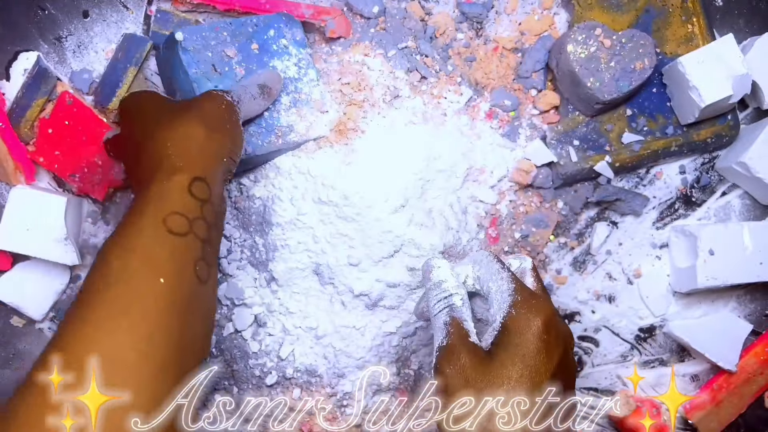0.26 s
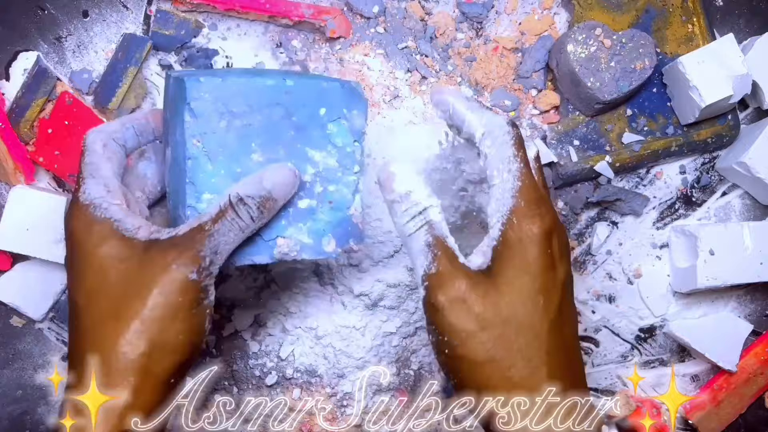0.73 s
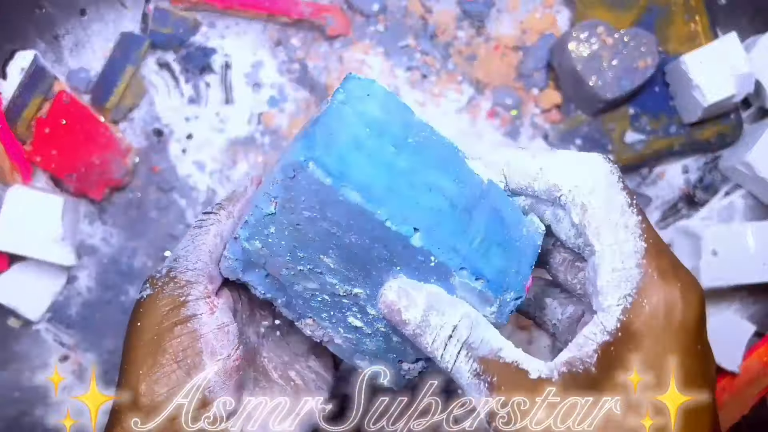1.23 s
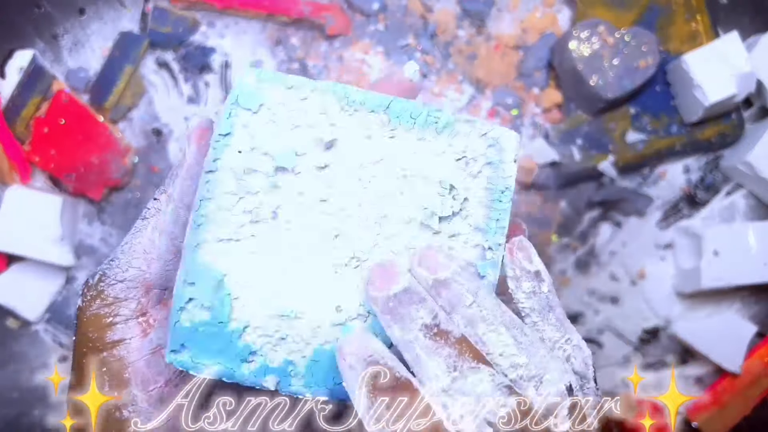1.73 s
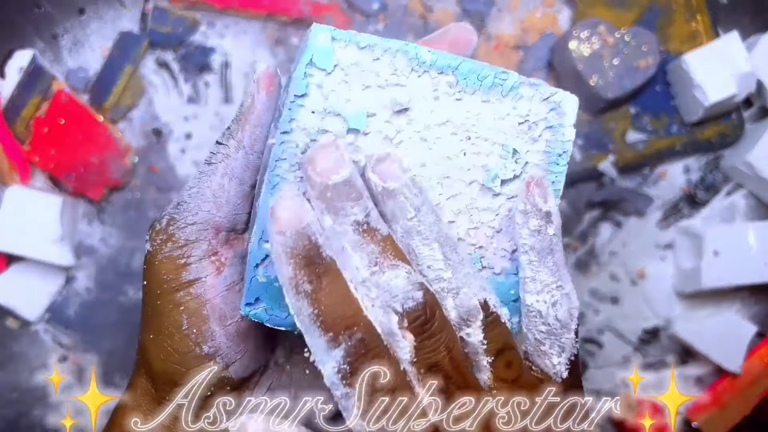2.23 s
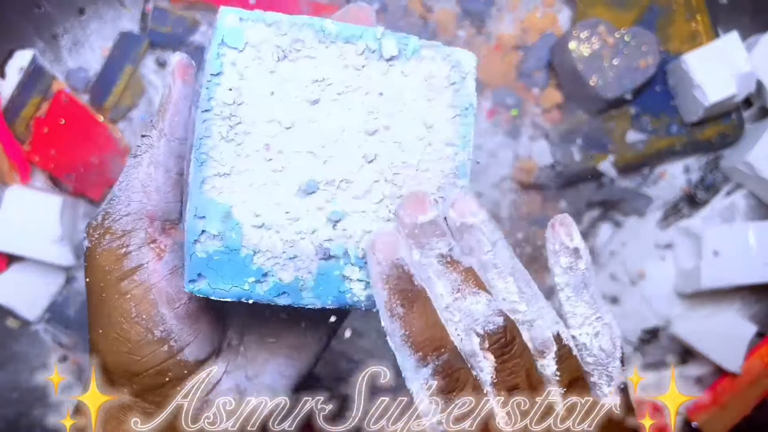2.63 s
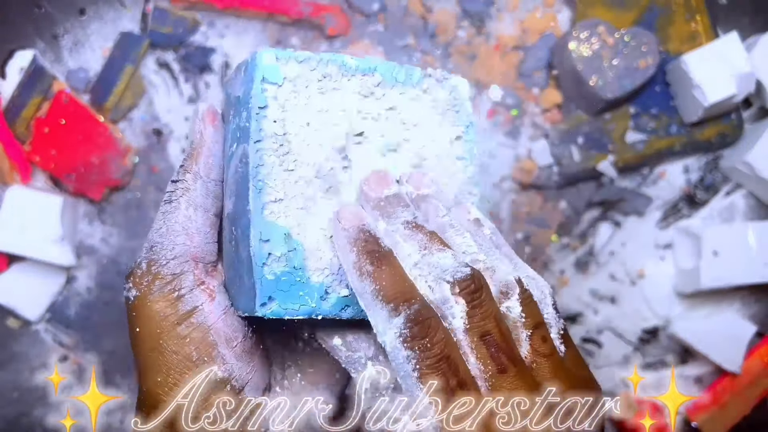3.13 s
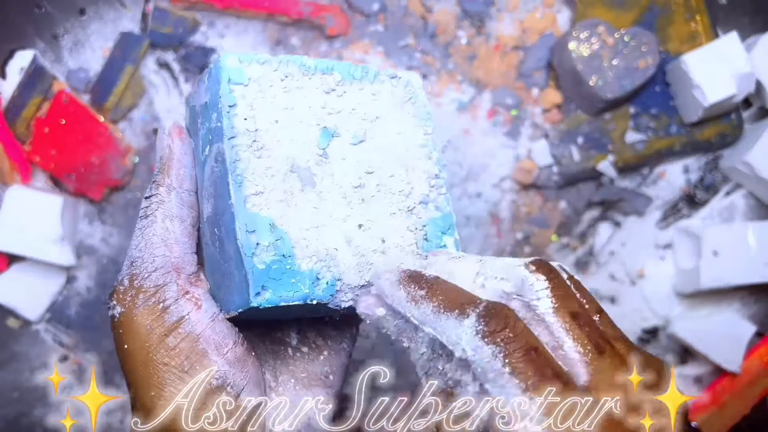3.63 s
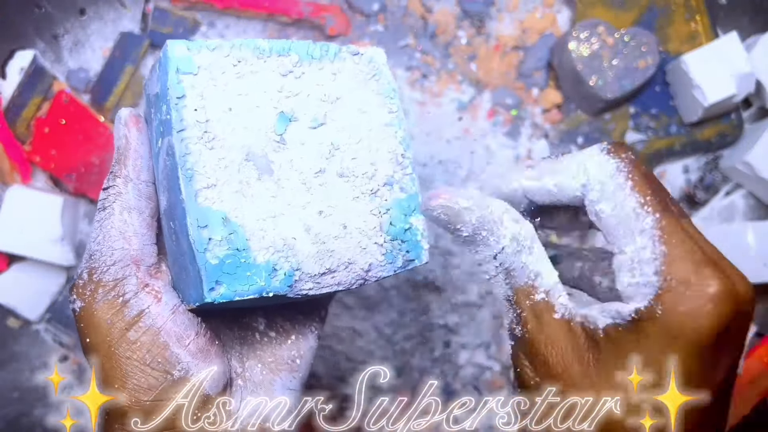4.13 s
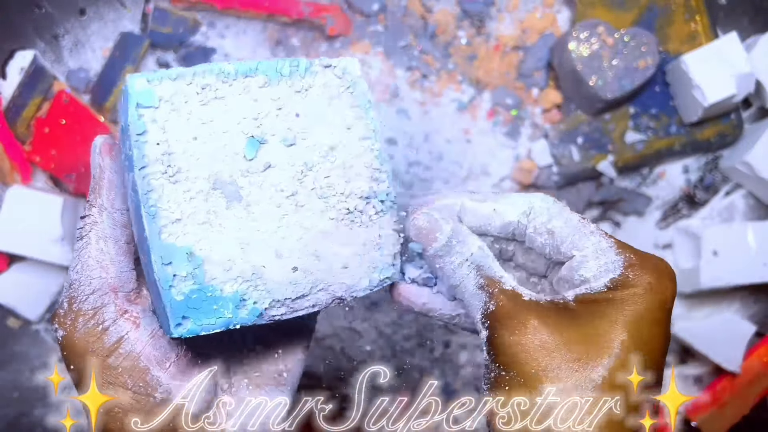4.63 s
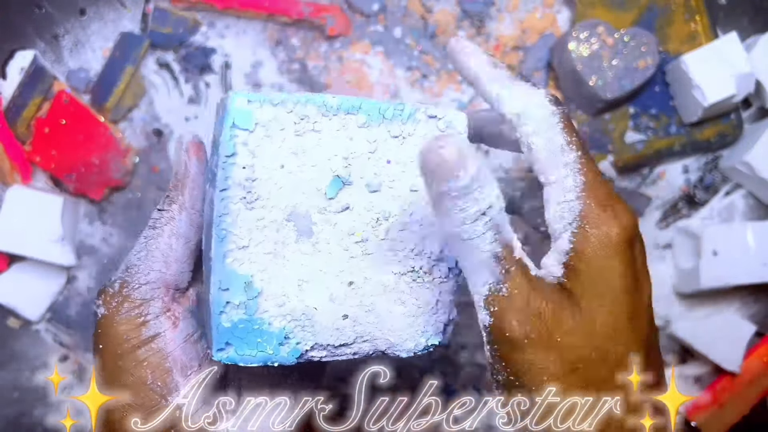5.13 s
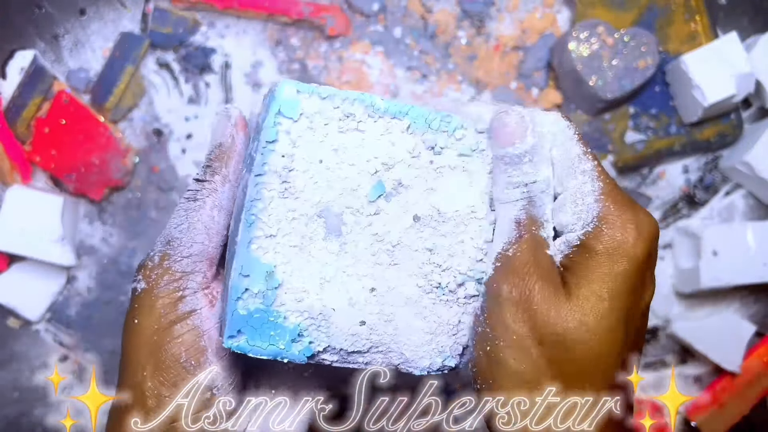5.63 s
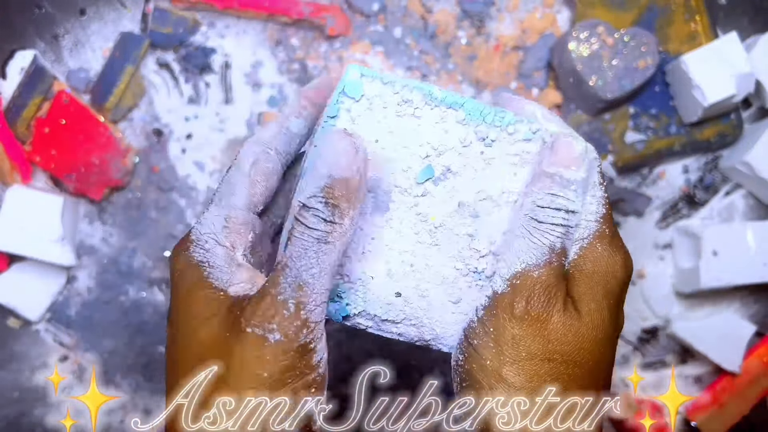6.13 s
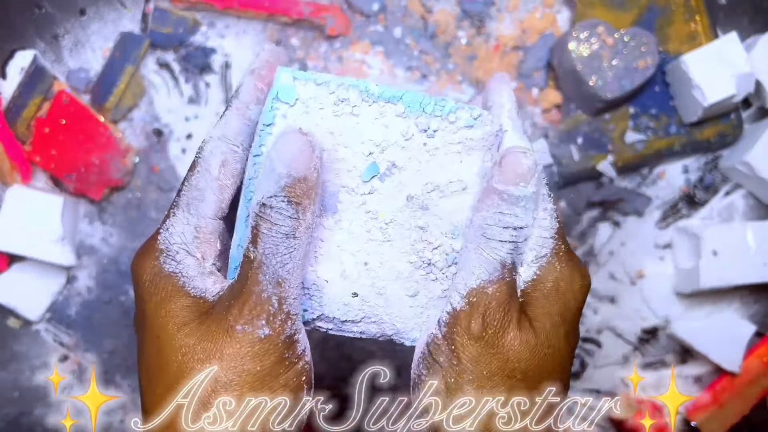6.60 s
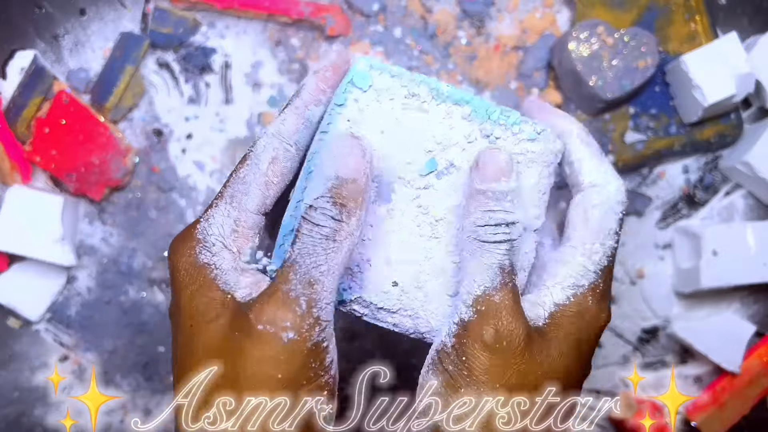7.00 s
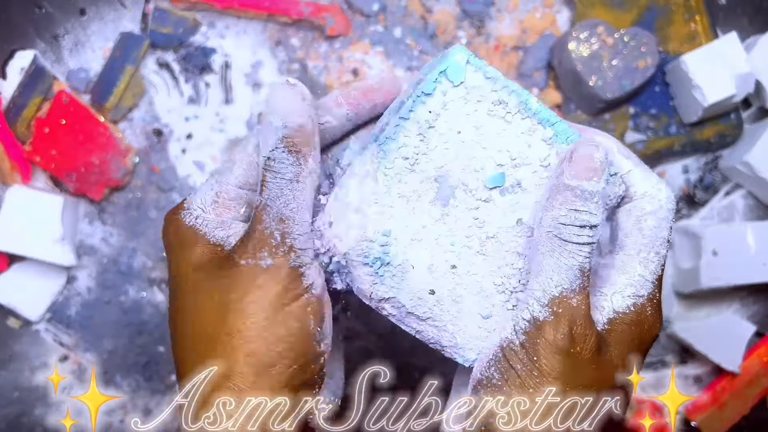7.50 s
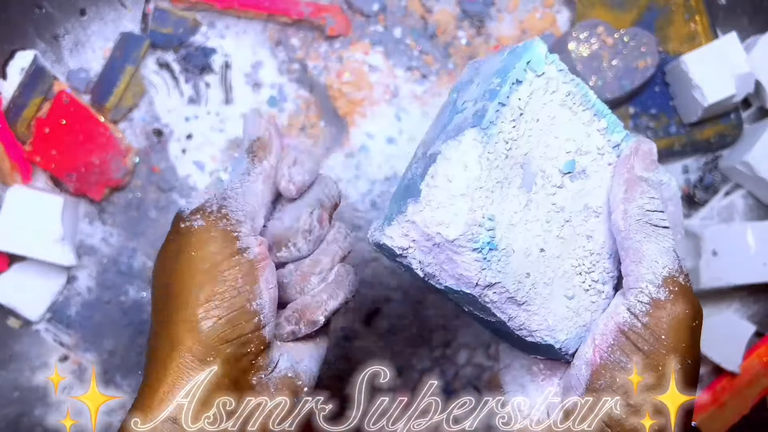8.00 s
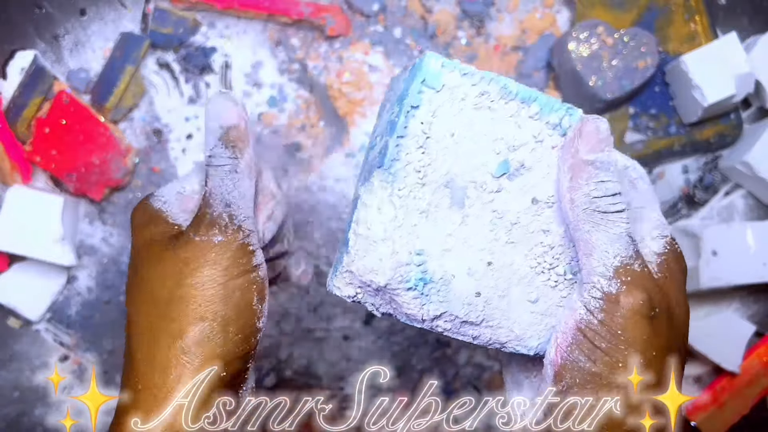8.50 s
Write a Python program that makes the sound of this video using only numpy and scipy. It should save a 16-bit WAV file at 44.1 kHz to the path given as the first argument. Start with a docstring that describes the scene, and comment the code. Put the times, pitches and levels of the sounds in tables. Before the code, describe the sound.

Hands rub and crumble a dry chalk block up close, gritty hisses and flake snaps, with lumps clattering onto a table over fan noise.

```python
"""In a small room, close to a stereo microphone, two hands rub and crumble a block of gym chalk over a table.
Each rubbing stroke is shaped noise: powder hisses, grit crunches and crumbs tick. Flakes snap in short noise bursts.
A few lumps drop and shatter; their blows set the table top ringing, and it booms softly.
A fan, made of filtered noise, blows on the right over rumble and a wavering hum.
Early on the whole sound fades almost to silence and returns."""
import sys
import numpy as np
from scipy import signal
from scipy.fft import rfft, irfft
from scipy.io import wavfile

SR = 44100
rng = np.random.default_rng(int(sys.argv[2]) if len(sys.argv) > 2 else 0)


def put_to_file(sound):
    """Save the sound as 16-bit audio at rate SR, in the file named by the first command-line argument."""
    columns = np.atleast_2d(sound).T  # one column per channel
    safe = np.clip(columns, -1, 1)
    whole_steps = np.round(safe * 32767)
    wavfile.write(sys.argv[1], SR, whole_steps.astype(np.int16))


N = 385875  # length in samples

# All table levels are relative; the functions add their own gains.
# wavering hum tones of the motor: (f/Hz, level/dB)
HUM_TONES = [(59.3, -38), (328, -50.5)]
# noise spectra of the rumble, the air and the fan: (f/Hz, level/dB)
RUMBLE_SPECTRUM = [(20, -27), (40, -4), (58, 1.5), (80, 6), (97, -7.5), (125, 1.5), (165, -9), (250, -12.5),
                   (330, -12), (470, -24.5), (900, -43), (2500, -57)]
AIR_SPECTRUM = [(100, -1.5), (330, -2), (480, -3.5), (800, -7), (2000, -21), (3500, -27.5), (6500, -29),
                (9000, -32), (16000, -50)]
FAN_SPECTRUM = [(500, -29), (780, -14), (980, 0), (1300, -3), (1650, -3.5), (2000, -11.5), (2500, -21),
                (2900, -18), (3700, -25.5), (4700, -25), (6000, -18), (7500, -40)]

# finger strokes over the block: (start t/s, length t/s, fine powder level/dB, coarse grit level/dB)
FINGER_STROKES = [(0, 0.1, -39, -29), (0.197, 0.085, -56, -28), (0.342, 0.091, -65, -32),
                  (0.45, 0.085, -48, -36), (0.946, 0.019, -27, -25), (1.009, 0.27, -31.5, -33.5),
                  (1.437, 0.1, -44, -38), (1.587, 0.12, -34, -34.5), (1.73, 0.06, -35, -40),
                  (1.89, 0.018, -38, -32), (1.995, 0.39, -35.5, -39), (2.224, 0.37, -26, -35),
                  (2.375, 0.079, -23, -32), (2.52, 0.29, -24, -30.5), (2.858, 0.15, -25.5, -31),
                  (2.993, 0.099, -36, -39), (3.078, 0.089, -22.5, -31), (3.163, 0.21, -28.5, -35.5),
                  (3.323, 0.04, -17.5, -22.5), (3.41, 0.038, -14, -21), (3.476, 0.42, -42, -38),
                  (3.838, 0.19, -34, -38), (4.185, 0.04, -35.5, -47), (4.319, 0.08, -28.5, -31.5),
                  (4.454, 0.041, -16, -21.5), (4.548, 0.09, -30.5, -30), (4.693, 0.023, -19.5, -24.5),
                  (4.809, 0.052, -22, -30), (4.894, 0.12, -31, -42), (5.206, 0.1, -30.5, -37.5),
                  (5.318, 0.17, -23.5, -33), (5.546, 0.098, -25.5, -27.5), (5.69, 0.15, -31, -34.5),
                  (5.905, 0.2, -32.5, -32), (6.176, 0.052, -25.5, -31), (6.267, 0.24, -39, -45),
                  (6.49, 0.1, -27, -31), (6.664, 0.07, -30, -34), (6.894, 0.17, -34.5, -35),
                  (7.048, 0.1, -32, -31), (7.193, 0.075, -30, -31.5), (7.268, 0.061, -21.5, -19.5),
                  (7.46, 0.052, -31, -31), (7.772, 0.092, -35, -32.5), (7.885, 0.17, -31, -32),
                  (8.14, 0.029, -36, -46), (8.273, 0.17, -30, -29.5), (8.406, 0.14, -36, -38),
                  (8.688, 0.24, -32, -28.5)]
# flat fingers sweeping the block's face: (start t/s, length t/s, level/dB)
FLAT_SWEEPS = [(1.02, 0.25, -38.5), (1.99, 0.51, -37.5), (2.58, 0.74, -35.5)]
# narrow resonances of the rasp: (f/Hz, width f/Hz, level/dB)
RASP_RESONANCES = [(4500, 280, 1.5), (4950, 410, 0), (5240, 390, -4)]
# noise spectra of powder and grit: (f/Hz, level/dB)
POWDER_SPECTRUM = [(300, -15.5), (1000, 0.5), (2000, -10.5), (3200, -8.5), (5500, 4), (7200, -0.5),
                   (9000, -0.5), (11000, 1), (16000, 0)]
GRIT_SPECTRUM = [(150, 3), (600, 2), (1500, 6), (2300, 5), (3600, 2.5), (5500, -8), (8000, -13.5),
                 (16000, -39)]
# ringing modes of the chalk block in the hand: (f/Hz, level/dB, time to fall 60 dB t/s)
BLOCK_MODES = [(662, -15, 0.044), (1920, 2, 0.047), (2210, -3, .04), (2650, -1.5, 0.027),
               (2960, -6.5, 0.04), (4000, -3, 0.073), (4160, -7, 0.031), (4950, -5.5, 0.045),
               (5980, -15, .045)]
# soft hollow crunches: fingers pressing or shifting the block, a fallen lump packing into powder:
# (centre t/s, level/dB, half-length t/s, hollow pitch f/Hz)
SOFT_CRUNCHES = [(0.04, -24, 0.027, 704), (0.208, -27, 0.016, 754), (0.41, -28, 0.011, 650),
                 (2.072, -33.5, 0.15, 1670), (2.28, -36, 0.17, 282), (2.4, -33.5, 0.045, 655),
                 (2.91, -31.5, 0.018, 680), (3.10, -35, 0.028, 650), (3.444, -33, 0.023, 654),
                 (3.677, -12.5, 0.011, 620), (3.859, -13.5, 0.0039, 654), (7.922, -36.5, 0.25, 348)]

# flakes snapping off: (t/s, level/dB, treble relative to the middle level/dB, clink of the block level/dB)
FLAKE_SNAPS = [(0.036, -13, -5.5, -27), (0.177, -17.5, 1, -30), (0.193, -21, -2, -40),
               (0.357, -30, -6, -36), (0.404, -22, -12.5, -32), (1.72, -16, -1, -29.5),
               (2.013, -26, 5, -42), (2.067, -33, -1, -35), (2.3555, -29, 7, -40), (2.375, -23, 6, -38),
               (2.58, -19, 3, -36), (2.61, -24, 7, -40), (2.645, -10.5, -1, -30), (2.65, -12.5, -6, -30),
               (2.719, -17, 5, -36), (2.766, -19.5, 12, -36), (2.7865, -10.5, 8, -32),
               (2.854, -15, -10, -34), (2.879, -25, 5, -34), (2.91, -22, 3, -34), (2.952, -24, 3, -38),
               (2.985, -22, 0, -38), (3.093, -17, -4, -32), (3.281, -31, 11, -44), (3.503, -23, -1, -38),
               (4.511, -11.5, -15, -33), (4.569, -22, -3, -40), (4.593, -25, 4, -42),
               (4.619, -21, -10, -34), (4.887, -25, -4, -40), (4.922, -26.5, 9, -42), (4.957, -33, 13, -46),
               (5.2, -29, 8, -46), (5.2488, -23.5, 13, -36), (5.336, -25, 3, -38), (5.44, -25, 12, -40),
               (5.596, -16.5, 2, -40), (5.965, -23, 13.5, -42), (6.207, -29, 9, -42), (6.518, -23, 9, -42),
               (6.712, -26.5, 6, -42), (7.316, -22, 9, -32), (7.473, -28, 9, -46), (7.818, -20, 3.5, -40),
               (8.234, -31, 8, -46), (8.377, -21.5, 7, -40), (8.398, -15, -2, -11.5),
               (8.407, -22, -10, -21), (8.452, -22, -5, -23), (8.547, -21.5, -7, -32)]
# noise spectrum of a snap: (f/Hz, level/dB)
SNAP_SPECTRUM = [(200, -19), (700, 7.5), (1500, 0), (2600, 4.5), (4500, 5.5), (6500, -0.5), (10000, -7.5),
                 (16000, -13.5)]

# lumps landing and the block being bumped: (t/s, shatter level/dB, knock level/dB, thud level/dB,
# crumbling time to fall 60 dB t/s, treble relative to the middle level/dB, lump pitch f/Hz)
LUMP_FALLS = [(0.0365, -35, -14, -16, 0.04, 0, 2000), (0.067, -44, -33, -18, .1, 0, 2500),
              (0.178, -32, -16, -30, .03, 2, 2000), (0.207, -33, -20, -22.5, 0.049, -3, 2500),
              (3.625, -10, -18, -40, 0.05, 4, 3000), (3.638, -7, -26, -17, 0.16, 1, 3350),
              (3.65, -5, -19, -23, 0.15, 1, 2900), (3.659, -4.5, -22, -23, 0.088, -1, 3800),
              (3.668, -24, -0.5, 5.5, 0.05, 0, 2500), (3.686, -15, -23, -21, 0.067, 10, 4300),
              (3.706, -8, -27, -32, 0.059, 5, 5400), (3.715, -6, -26, -35, 0.06, -4, 5370),
              (3.738, -17.5, -28, -16.5, 0.45, -1, 3400), (3.754, -25, -19, -27, 0.033, -7, 5200),
              (3.766, -18, -24, -29, 0.073, -7, 2700), (3.795, -9, -35, -19.5, 0.099, -22, 3100),
              (3.852, -3.5, -27, -8.5, 0.018, -9, 2850), (3.861, -21, -28, -28, .06, -2, 3400),
              (3.902, -26.5, -39, -23, 0.11, 7.5, 4500), (3.928, -19.5, -20, -41, 0.028, -9, 3070),
              (4.7094, -1, 4, -22, 0.043, 0.5, 2100), (4.715, -8.5, -8.5, -12, 0.1, -6, 2850),
              (4.8222, -10, -15, -37, 0.033, -4, 3050), (4.826, -23, -15, -23, 0.058, 1, 2450),
              (8.2612, -40, -19, -46, 0.02, -2, 2500)]
# ringing modes of the table top: (f/Hz, level/dB, time to fall 60 dB t/s)
TABLE_MODES = [(140.5, 0, 0.12), (196.6, -13, 0.26), (327, -4.5, 0.11), (411.5, 1.5, 0.21),
               (560, -3, 0.056), (754, -10, 0.12), (860, -2.5, 0.083), (966, -0.5, 0.12), (1507, -12, .2),
               (1820, -12, 0.16), (2090, -3.5, 0.098), (2400, -2, 0.098), (2500, -20, 0.15),
               (2930, -9, .18), (3483, -11.5, .14)]
# noise spectra of shattering, knocking and thudding: (f/Hz, level/dB)
SHATTER_SPECTRUM = [(300, -18), (1800, -14), (2800, 2.5), (4000, 0), (6000, -0.5), (8000, -10),
                    (11000, -8.5), (16000, -36)]
KNOCK_SPECTRUM = [(80, -10), (290, -26), (410, 1.5), (620, -8.5), (920, 12), (1300, -2), (1800, 3.5),
                  (2400, 5), (5000, -24), (12000, -33)]
THUD_SPECTRUM = [(40, -28.5), (90, 7.5), (135, 6), (190, 1.5), (320, 5.5), (430, 0), (640, -2.5),
                 (1200, -10.5), (4000, -39)]

# resonances of the right microphone port: (f/Hz, width f/Hz, boost level/dB)
PORT_RESONANCES = [(1110, 1100, -2.5), (4676, 380, 7.5), (5460, 880, 6)]

# time scales of a stroke's smooth start and end
STROKE_ATTACK_S, STROKE_RELEASE_S = 0.0097, 0.016
STROKE_EASE = 0.055  # share of the stroke's length added to both
# faint rustle of the holding hand, under the strokes
HOLD_POWDER_DB, HOLD_GRIT_DB = -50, -48
# bright flakes die away sooner: the t60 halves for this much more treble
SNAP_T60_S, SNAP_HALVING_DB = 0.048, 40
# range of crumb pitches; each tick falls 60 dB in this many cycles
CRUMB_LOW_HZ, CRUMB_HIGH_HZ, CRUMB_CYCLES = 4300, 14500, 28
# the thud comes just after the contact and leaves a low boom
THUD_LAG_S, BOOM_T60_S = 0.00296, 0.3
FADE_OUT_START_S, FADE_OUT_END_S, FADE_IN_START_S, FADE_IN_END_S = 0.64, 0.785, 0.87, 1.054
FADE_CURVE, FADE_FLOOR_DB = 1.3, -64
CUTOFF_HZ = 15880


def from_db(db):
    """Turn decibels into a gain."""
    return 10 ** (np.asarray(db) / 20)


def rms_one(x):
    """Scale to unit power."""
    return x / np.sqrt(np.mean(x ** 2) + 1e-20)


def drift(rate_hz):
    """Slow random wandering around zero with unit power, made by smoothing noise."""
    r = np.exp(-80 * np.pi * rate_hz / SR)
    noise = rng.standard_normal(N // 40 + 2002)  # one value per 40 samples
    slow = signal.lfilter([1], [1, -2 * r, r * r], noise)[2000:]
    return np.interp(np.arange(N) / 40, np.arange(len(slow)), rms_one(slow))


def colour(x, spectrum, size=8192):
    """Filter to the given spectrum with no sound ahead of the input; white noise keeps its power."""
    table_hz, table_db = np.transpose(spectrum)
    hz = np.arange(size // 2 + 1) * SR / size
    gain = rms_one(from_db(np.interp(np.log(hz + 1), np.log(table_hz), table_db)))
    # folding the cepstrum makes the filter minimum-phase
    cepstrum = irfft(np.log(gain))[:size // 2]
    cepstrum[1:] *= 2
    response = irfft(np.exp(rfft(cepstrum, size)))
    return signal.oaconvolve(np.atleast_2d(x), response[None], axes=1)[:, :N]


def two_bands(low, high, split_hz):
    """Join the bass and middle of one sound to the treble of another."""
    lowpass = signal.butter(2, split_hz, "low", fs=SR, output="sos")
    highpass = signal.butter(2, split_hz, "high", fs=SR, output="sos")
    return signal.sosfilt(lowpass, low) + signal.sosfilt(highpass, high)


def ring(force, hz, t60):
    """One ringing mode: a unit click starts a dying sine of height about 1."""
    r, w = from_db(-60 / (t60 * SR)), 2 * np.pi * hz / SR
    return signal.lfilter([0, np.sin(w)], [1, -2 * r * np.cos(w), r * r], force + 1e-18)


def body(force, modes):
    """Let one force ring all modes of an object, with alternating signs."""
    out = 0
    for k, (hz, db, t60) in enumerate(modes):
        out = out + (-1) ** k * from_db(db) * ring(force, hz, t60)
    return out


def grains(per_s, spread_db):
    """Tiny fractures at random moments and of random size, radiating unevenly to the two sides."""
    sizes = from_db(spread_db * np.minimum(rng.exponential(1, N), 5))
    happens = rng.random(N) < per_s / SR
    return rms_one(sizes * happens * rng.standard_normal((2, N)))


def bursts(times, levels_db, t60s, crack_db=4, crack_t60=0.017, rise_s=0.00018, per_s=30000):
    """Each break opens with a hard crack, then an avalanche of fractures dies away."""
    envelope, t = np.zeros(N), np.arange(SR // 2) / SR
    for s, db, t60 in zip(times, levels_db, t60s):
        at = round(s * SR)
        shape_db = np.maximum(-60 * t / t60, crack_db - 60 * t / crack_t60)
        burst = from_db(db + shape_db) * (1 - np.exp(-t / rise_s))
        envelope[at:at + len(t)] += burst[:N - at]
    return envelope * grains(per_s=per_s, spread_db=2.0)


def taps(times, levels_db, lag_s=0.0003):
    """Single hard contacts as clicks, reaching the left microphone a little after the right."""
    out = np.zeros((2, N))
    for s, db in zip(times, levels_db):
        out[0, round((s + lag_s) * SR)] += from_db(db)
        out[1, round(s * SR)] += from_db(db)
    return out


def strokes(starts, lengths, levels_db, rest_db=-90):
    """Loudness of overlapping strokes: each swells, holds while the finger slides and dies away."""
    t, power = np.arange(0, N, 40) / SR, from_db(rest_db) ** 2
    for s, length, db in zip(starts, lengths, levels_db):
        attack = STROKE_ATTACK_S + STROKE_EASE * length
        release = STROKE_RELEASE_S + STROKE_EASE * length
        grip = .5 + .5 * np.tanh(.5 * (t - s) / attack)
        let_go = .5 + .5 * np.tanh(.5 * (s + length - t) / release)
        power = power + (from_db(db) * grip * let_go) ** 2
    return np.interp(np.arange(N) / SR, t, np.sqrt(power))


def slips(per_s, t60, depth):
    """The finger catches and slips at uneven moments; each slip sheds a quickly dying puff."""
    jerks = (rng.random(N) < per_s / SR) * rng.uniform(.3, 1, N)
    puffs = signal.lfilter([1], [1, -from_db(-60 / (t60 * SR))], jerks + 1e-18)
    return rms_one(1 - depth + depth * rms_one(puffs))


def crumbs(per_s, spread_db, count=18):
    """Crumbs crack at random moments, each ticking at one of a set of pitches; unit power."""
    ticks, dealt = grains(per_s, spread_db), rng.integers(0, count, N)
    out = 0
    for k, hz in enumerate(np.geomspace(CRUMB_LOW_HZ, CRUMB_HIGH_HZ, count)):
        out = out + ring(ticks * (dealt == k), hz, CRUMB_CYCLES / hz)
    return rms_one(out)


def background(rumble_db=-31.0, air_db=-36, fan_db=-25.5, fan_left_db=-15, waver_db=11.0, wander=0.93):
    """Rumble and a wavering hum reach both sides alike; the fan's hollow rush comes from the right."""
    rumble = from_db(rumble_db) * colour(rng.standard_normal(N), RUMBLE_SPECTRUM)
    air = from_db(air_db) * colour(rng.standard_normal((2, N)), AIR_SPECTRUM)
    fan = from_db(fan_db) * colour(rng.standard_normal((2, N)), FAN_SPECTRUM)
    fan = fan * from_db([[fan_left_db], [0]])
    t, hum = np.arange(N) / SR, 0
    for hz, db in HUM_TONES:
        swell, phase_drift = np.tanh(drift(3)), drift(3)
        tone = np.sin(2 * np.pi * hz * t + wander * phase_drift)
        hum = hum + np.sqrt(2) * from_db(db + waver_db * swell) * tone
    return rumble + air + fan + hum


def rubbing(powder_gain_db=0.67, grit_gain_db=0, crumb_gain_db=-6, block_db=-41, judder_db=1.5, clump_db=1.3):
    """Skin shears off hissing powder, grit rolls in clumps and single crumbs crackle under the fingers."""
    s, length, powder_db, grit_db = np.transpose(FINGER_STROKES)
    shearing = strokes(s, length, powder_db, HOLD_POWDER_DB)
    rolling = strokes(s, length, grit_db, HOLD_GRIT_DB)
    catching = slips(per_s=70, t60=0.076, depth=0.62)
    powder = grains(per_s=20000, spread_db=0.0) * shearing * slips(per_s=120, t60=0.073, depth=0.19)
    powder = powder * from_db(powder_gain_db + judder_db * drift(19))
    rasp = rasping() * strokes(*np.transpose(FLAT_SWEEPS)) * catching
    grit = grains(per_s=12000, spread_db=0.5) * rolling * catching
    grit = grit * from_db(grit_gain_db + clump_db * drift(32))
    crackle = crumbs(per_s=300, spread_db=1.3) * np.sqrt(rolling * shearing) * from_db(crumb_gain_db)
    block = from_db(block_db) * body(grit, BLOCK_MODES)
    return colour(powder, POWDER_SPECTRUM) + rasp + colour(grit, GRIT_SPECTRUM) + crackle + block


def soft_crunching(width=1.173):
    """Packing powder gives soft crunches: grains in a narrow hollow band swell and die away."""
    t, out = np.arange(N) / SR, 0
    packing = grains(per_s=3700, spread_db=-1.5)
    for s, db, half_length, hz in SOFT_CRUNCHES:
        hollow = signal.butter(2, [hz / width, hz * width], "band", fs=SR, output="sos")
        swell = from_db(db) * np.exp(-((t - s) / half_length) ** 2 / 2)
        out = out + swell * rms_one(signal.sosfilt(hollow, packing))
    return out


def snapping(gain_db=-1, block_db=-41, split_hz=6000, rise_s=0.00071):
    """Flakes crack off: thin ones are brighter and shorter, and the block recoils with a brittle clink."""
    s, db, treble_db, clink_db = np.transpose(FLAKE_SNAPS)
    t60 = SNAP_T60_S * 2 ** (-treble_db / SNAP_HALVING_DB)
    middle = bursts(s, db, t60, rise_s=rise_s)
    treble = bursts(s, db + treble_db, t60, rise_s=rise_s)
    cracks = two_bands(middle, treble, split_hz)
    recoil = taps(s, clink_db, lag_s=0.00022)
    clink = body(from_db(block_db) * cracks + recoil, BLOCK_MODES)
    return from_db(gain_db) * colour(cracks, SNAP_SPECTRUM) + clink


def falling(ring_db=-43, tap_db=-19, shatter_gain_db=-3, knock_gain_db=-3.5, split_hz=5500):
    """A lump raps on the table top, sets it ringing and shatters."""
    s, shatter_db, knock_db, _, t60, treble_db, _ = np.transpose(LUMP_FALLS)
    middle = bursts(s, shatter_db + shatter_gain_db, t60, per_s=6000)
    treble = bursts(s, shatter_db + treble_db + shatter_gain_db, t60, per_s=6000)
    shatter = colour(two_bands(middle, treble, split_hz), SHATTER_SPECTRUM)
    knock = bursts(s, knock_db + knock_gain_db, t60)
    force = from_db(ring_db) * (knock + .5 * shatter) + taps(s, knock_db + tap_db, lag_s=0.000075)
    return shatter + lump_rings() + colour(knock, KNOCK_SPECTRUM) + body(force, TABLE_MODES)


def lump_rings(gain_db=-4, t60=0.043, overtone=1.33, overtone_db=-4, width=0.1):
    """Each lump chinks at two pitches, made rough by using narrow bands of dying noise."""
    out, t = np.zeros((2, N)), np.arange(SR // 6) / SR
    for s, db, *_, hz in LUMP_FALLS:
        at = round(s * SR)
        for pitch, part_db in ((hz, 0), (hz * overtone, overtone_db)):
            edges = [pitch * (1 - width / 2), pitch * (1 + width / 2)]
            band = signal.butter(1, edges, "band", fs=SR, output="sos")
            chink = rms_one(signal.sosfilt(band, rng.standard_normal((2, len(t)))))
            out[:, at:at + len(t)] += chink * from_db(db + gain_db + part_db - 60 * t / t60)
    return out


def debris(gain_db=-25, t60=0.31):
    """Crumbs from each burst lump skitter dryly over the table, fading after each fall."""
    s, shatter_db, *_ = np.transpose(LUMP_FALLS)
    hits = taps(s, shatter_db)[1] ** 2
    power = signal.lfilter([1], [1, -from_db(-60 / (t60 * SR)) ** 2], hits + 1e-18)
    return from_db(gain_db) * np.sqrt(power) * crumbs(per_s=350, spread_db=-1.5)


def thudding(blow_db=11, boom_db=-15.5, push_db=-4, soft_hz=250):
    """A lump's weight gives one soft push; the table top swings and booms on, alike on both sides."""
    s, _, _, thud_db, *_ = np.transpose(LUMP_FALLS)
    late, boom_t60 = s + THUD_LAG_S, np.full(len(s), BOOM_T60_S)
    blows = taps(late, thud_db)[1]
    boom = bursts(late, thud_db + boom_db, boom_t60, crack_db=10.5, crack_t60=0.12)[0]
    push = signal.sosfilt(signal.butter(2, soft_hz, fs=SR, output="sos"), blows + 1e-18)
    swing = from_db(push_db) * body(push, TABLE_MODES)
    return colour(from_db(blow_db) * blows + boom, THUD_SPECTRUM) + swing


def rasping(waver_db=3.5):
    """Skin chatters in a few narrow resonances that randomly come and go; unit power."""
    chatter, out = grains(per_s=5200, spread_db=-1.0), 0
    for hz, width, db in RASP_RESONANCES:
        band = signal.butter(2, [hz - width / 2, hz + width / 2], "band", fs=SR, output="sos")
        out = out + signal.sosfilt(band, chatter) * from_db(db + waver_db * drift(11))
    return rms_one(out)


def room(x, tail_db, t60=0.21, low_hz=250, dull_hz=5000):
    """Add a short dull tail of dying noise to the direct sound, unrelated on each side."""
    t = np.arange(SR // 3) / SR
    walls = signal.butter(2, [low_hz, dull_hz], "band", fs=SR, output="sos")
    tail = signal.sosfilt(walls, rng.standard_normal((2, len(t))))
    tail = tail * from_db(-60 * t / t60) * (t > .003)  # the tail starts after 3 ms
    echo = signal.oaconvolve(x, rms_one(tail) / np.sqrt(len(t)), axes=1)[:, :N]
    return x + from_db(tail_db) * echo


def shared_treble(x, share=0.86, lag_s=0.00011, above_hz=6500):
    """The finest hiss is partly the same at both microphones and reaches the left one first."""
    highpass = signal.butter(2, above_hz, "high", fs=SR, output="sos")
    treble = signal.sosfiltfilt(highpass, x)
    t = np.arange(N) / SR
    late = np.interp(t - lag_s, t, treble[0])
    right = x[1] + share * late + (np.sqrt(1 - share ** 2) - 1) * treble[1]
    return np.array([x[0], right])


def right_port(x):
    """The right microphone's port resonates, changing the level around a few pitches."""
    right = x[1]
    for hz, width, db in PORT_RESONANCES:
        peak = signal.lfilter(*signal.iirpeak(hz, hz / width, fs=SR), right)
        right = right + (from_db(db) - 1) * peak
    return np.array([x[0], right])


def fade():
    """Gain of the brief fade almost to silence and back."""
    t = np.arange(N) / SR
    corners = [FADE_OUT_START_S, FADE_OUT_END_S, FADE_IN_START_S, FADE_IN_END_S]
    ramp = np.interp(t, corners, [1, 0, 0, 1])
    return np.maximum(ramp ** FADE_CURVE, from_db(FADE_FLOOR_DB))


def scene():
    """Mix the chalk handling, the slightly more echoing table, the dry debris and the background."""
    chalk = room(rubbing() + snapping() + soft_crunching(), tail_db=-10.5)
    chalk = right_port(shared_treble(chalk))
    table = room(falling() + thudding(), tail_db=-9.5)
    return chalk + table + debris() + background()


def record(dry, gain_db=-0.36):
    """Apply the brief fade, clip any peaks that overload and cut the highest treble."""
    clipped = np.clip(dry * from_db(gain_db) * fade(), -1, 1)
    top_cut = signal.ellip(10, .05, 60, CUTOFF_HZ, fs=SR, output="sos")
    return signal.sosfiltfilt(top_cut, clipped)


dry = scene()
out = record(dry)
put_to_file(out)
```